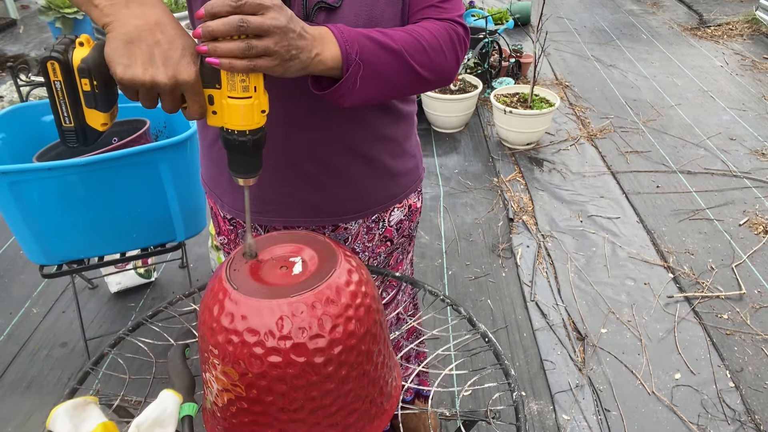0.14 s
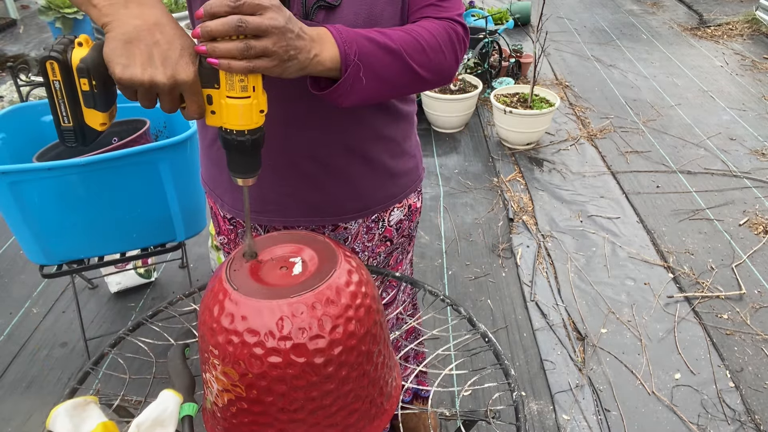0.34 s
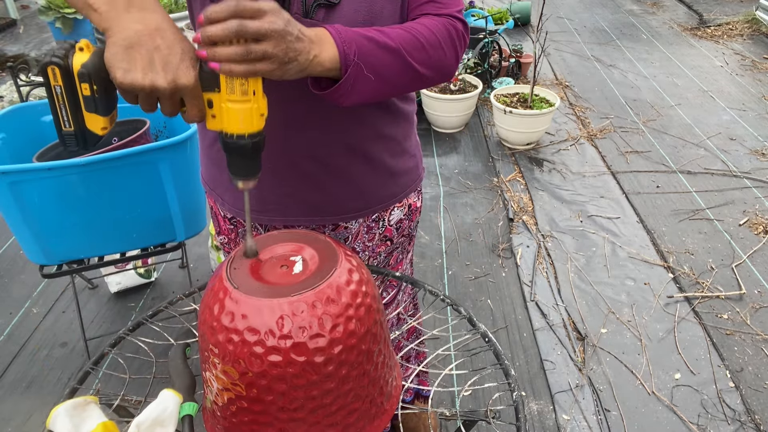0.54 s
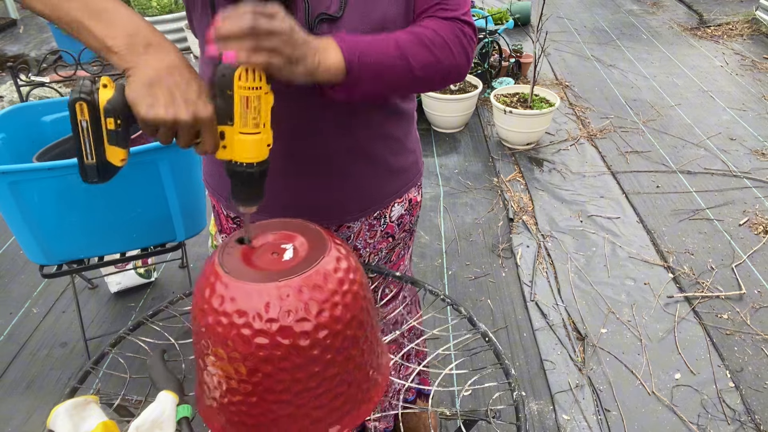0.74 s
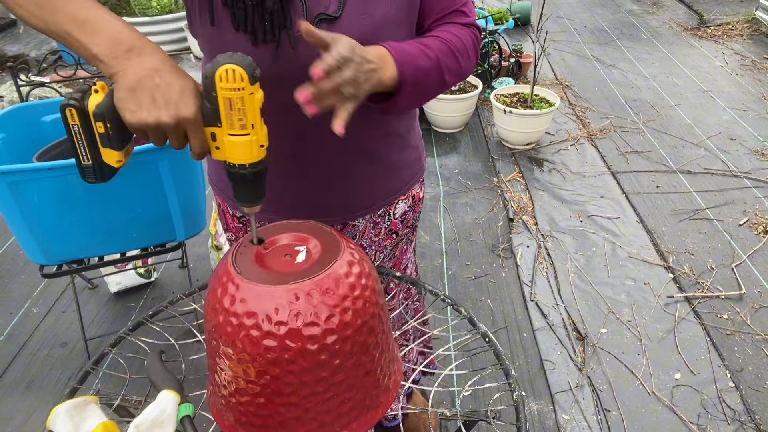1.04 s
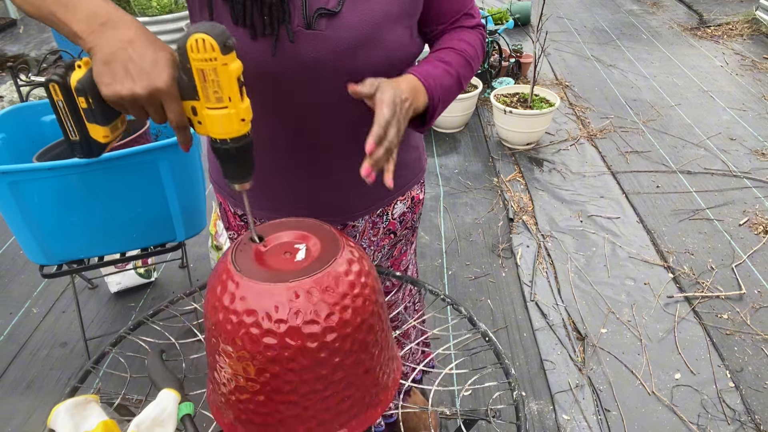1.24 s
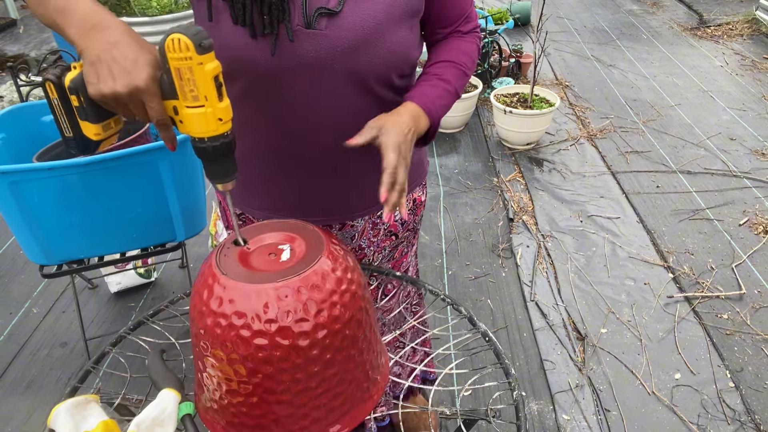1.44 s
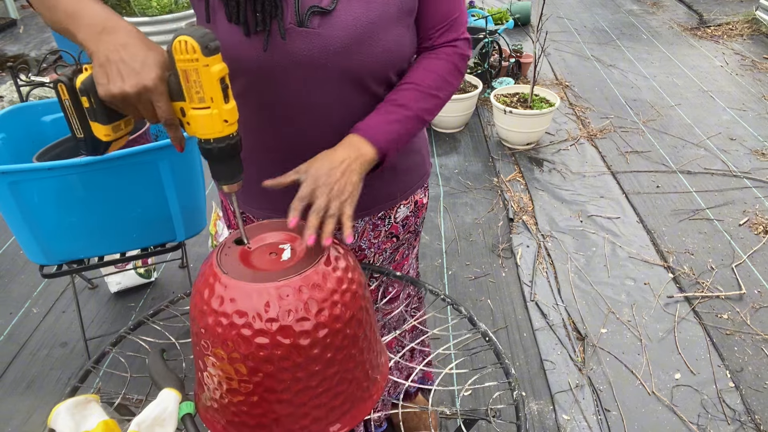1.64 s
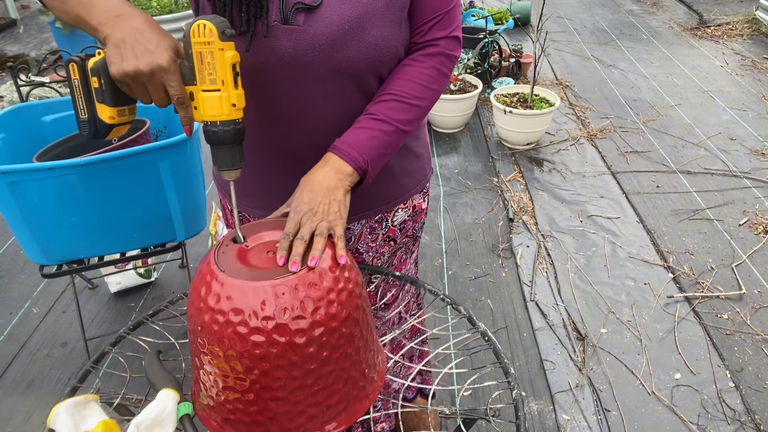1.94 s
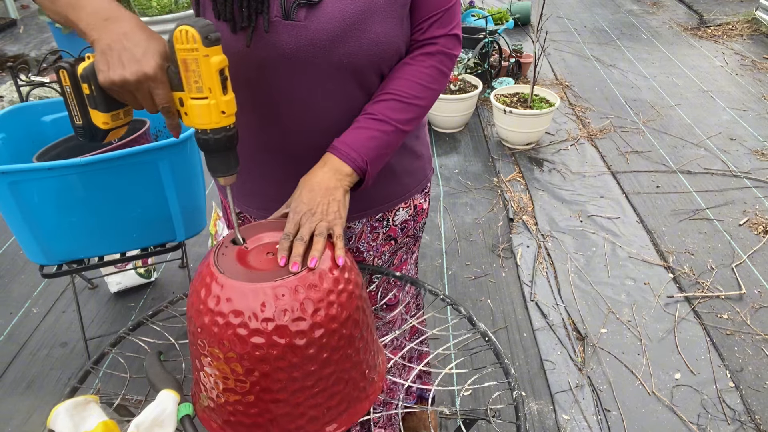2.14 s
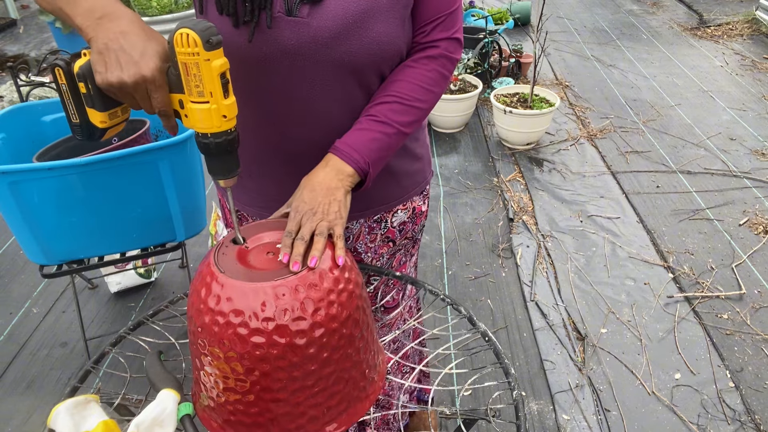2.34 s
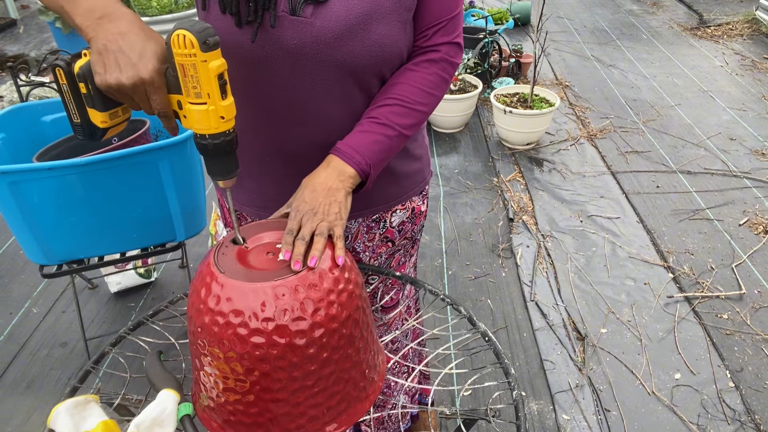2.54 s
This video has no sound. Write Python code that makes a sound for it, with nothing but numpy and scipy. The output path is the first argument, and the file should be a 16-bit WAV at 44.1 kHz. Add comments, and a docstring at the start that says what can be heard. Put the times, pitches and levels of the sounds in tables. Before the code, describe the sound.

Close up outdoors, a power drill's high whine and gritty boring give way to hollow bangs and a sudden stop with a click, then rattly scrapes, light pot taps, soft wind and faint birds.

```python
"""Drilling through a plastic pot outdoors

Close to the microphone pair, a cordless drill bores through an upturned pot, breaks through and brakes:
gliding sine whines over coloured noise. Random slips excite pot and table; knocks and booms are decaying modes.
The bit then scrapes and knocks in the hole and a hand lands on the hollow pot.
Wind rumbles as filtered noise; far birds cluck and whistle as gliding sines with a yard echo."""
import sys
import numpy as np
from scipy import signal
from scipy.fft import rfft, irfft, next_fast_len
from scipy.io import wavfile
from scipy.ndimage import uniform_filter1d

SR = 44100
rng = np.random.default_rng(int(sys.argv[2]) if len(sys.argv) > 2 else 0)


def dump_mix(stems):
    """Bounce the given channels to the path in sys.argv[1] as a 16-bit WAV at rate SR."""
    frames = np.atleast_2d(stems).T  # one column per channel
    limited = np.clip(frames, -1, 1)  # hard clip at full scale
    pcm = np.round(limited * 32767).astype(np.int16)
    wavfile.write(sys.argv[1], SR, pcm)


def nominal_scale(level):
    """Amplitude ratio for a level in decibels (scalar or array-like)."""
    x = np.asarray(level, float) / 20
    return 10 ** x


N = 119070

# Modes of the air in the pot. Each row: frequency in Hz, relative level in dB, t60 in s.
POT_AIR = [(302.4, 8, 0.099), (333, -12, 0.19), (272.5, -3.5, 0.18), (231, -4.5, 0.036), (154, -6, 0.059),
           (127, -14.5, 0.071)]
# Modes of the pot wall. Each row: frequency in Hz, relative level in dB, t60 in s.
POT_WALL = [(463, 10, 0.028), (618, 0, 0.039), (778, -1.5, 0.037), (905, 9.5, 0.026), (1052, 1.5, 0.031),
            (1213, 11.5, 0.015), (1418, 5, 0.029), (1694, -4, 0.04), (1884, -6, .04), (2240, -11.5, 0.047),
            (2926, -12.5, 0.019), (3560, -25, 0.046)]
# Modes of the table under the pot. Each row: frequency in Hz, relative level in dB, t60 in s.
TABLE = [(67, -17, 0.12), (103.4, -6.5, 0.22), (125, 1, 0.0092), (158, 4, 0.041), (215, 0, 0.078),
         (255, 2.5, .06)]


def evened(x):
    """Scales to unit rms."""
    return x / np.sqrt(np.mean(x ** 2) + 1e-20)


def curve(rows, col=1, off=None):
    """Draws a table column over time; off is the value outside the rows, else the end values hold."""
    rows = np.array(rows)
    return np.interp(np.arange(N) / SR, rows[:, 0], rows[:, col], off, off)


def phase(hz):
    """Sums a changing frequency into radians."""
    return 2 * np.pi * np.cumsum(hz) / SR


def read(points, hz):
    """Reads a spectrum table at hz, along a logarithmic frequency axis."""
    f, v = np.transpose(points)
    return np.interp(np.log(hz + 1), np.log(f + 1), v)


def coloured(points, x):
    """Filters x by a spectrum table in dB and scales it to unit rms."""
    gain = nominal_scale(read(points, np.fft.rfftfreq(N, 1 / SR)))
    return evened(irfft(rfft(x) * gain, N))


def slow_noise(size):
    """Random unit-rms drift: noise averaged twice over size samples."""
    once = uniform_filter1d(rng.standard_normal(N), size)
    return evened(uniform_filter1d(once, size))


def add(mix, s, sound):
    """Mixes a sound in at s seconds."""
    part = mix[round(s * SR):][:len(sound)]
    part += sound[:len(part)]


def ring(modes, tilt=0, rise_s=0.0012):
    """Sums the decaying modes that one blow excites, peak 1; tilt in dB per octave pivots at 1 kHz."""
    t = np.arange(SR // 3)[:, None] / SR
    hz, db, t60 = np.transpose(modes)
    level = nominal_scale(db + tilt * np.log2(hz / 1000) - 60 * t / t60)
    r = (level * np.sin(2 * np.pi * hz * t)).sum(1)
    r = r * (1 - np.exp(-t[:, 0] / rise_s))
    return r / abs(r).max()


def damped(x, held, power):
    """Chokes a ring: half its amplitude is left at held seconds, ever less after."""
    return x / (1 + (np.arange(len(x)) / SR / held) ** power)


def slips(per_s, spread_db):
    """Sparse random clicks of uneven size."""
    u, e, g = rng.random(N), rng.exponential(1, N), rng.standard_normal(N)
    return (u < per_s / SR) * nominal_scale(spread_db * np.minimum(e, 4)) * g


def motor():
    """Gear whines at the tooth mesh and its multiples ride on the rush of brushes and fan."""
    # Gear whine. Each row: time in s, mesh frequency in Hz, rms level in dB.
    whine = [(0, 4137, -37), (.2, 4132, -36), (.43, 4090, -37), (.5, 4055, -36), (.536, 3990, -35),
             (.6, 4090, -40), (.68, 4200, -36), (.71, 4215, -30), (.79, 4257, -33), (.83, 4160, -31),
             (.88, 3910, -35), (.95, 3520, -37), (.965, 3450, -50)]
    # Upper whines. Each row: multiple of the mesh, then a list of time in s, rms level in dB.
    upper = [(2.5, [(0, -39), (.3, -36), (.5, -34), (.7, -31), (.73, -44), (.83, -39), (.86, -70)]),
             (2.93, [(.8, -70), (.83, -46), (.89, -48), (.92, -37), (.96, -37), (.975, -70)])]
    # Motor and cooling fan rush. Each row: time in s, rms level in dB.
    rush_level = [(0, -24), (.3, -24.5), (.6, -24.5), (.72, -27), (.85, -26), (.98, -29), (1.008, -28),
                  (1.016, -46.5), (1.05, -58), (1.075, -74)]
    # Colour of the rush. Each row: frequency in Hz, relative level in dB per Hz.
    rush_colour = [(300, -24), (700, -4.5), (1500, -5), (2500, -3.5), (3300, -8.5), (4300, -3.5),
                   (5500, -7.5), (7500, -5), (9000, 2.5), (10500, -5), (12000, -14.5), (14500, -0.5),
                   (15800, -22)]
    waver = 0.0014 * evened(uniform_filter1d(rng.standard_normal(N), 300))
    turning = phase(curve(whine) * (1 + waver))
    out = np.sqrt(2) * nominal_scale(curve(whine, col=2, off=-120)) * np.sin(turning)
    for multiple, level in upper:
        out += np.sqrt(2) * nominal_scale(curve(level, off=-120)) * np.sin(multiple * turning)
    rush = rng.standard_normal(N) + .5 * evened(slips(2500, 3))
    running = np.arange(N) < rush_level[-1][0] * SR
    return out + nominal_scale(curve(rush_level)) * running * coloured(rush_colour, rush)


def grinding(drive):
    """Slips of the bit on the wall ring its modes and scuff broadly."""
    # Bit grinding on the wall. Each row: time in s, rms level in dB.
    grind = [(0, -30), (.25, -29), (.45, -30), (.51, -32), (.55, -27.5), (.62, -32), (.635, -42),
             (.7, -30.5), (.74, -31.5), (.77, -28.5), (.82, -28.5), (.89, -35.5), (.99, -37), (1.03, -41),
             (1.07, -55.5), (1.15, -64), (1.19, -44.5), (1.21, -52.5), (1.26, -72), (1.268, -46.5),
             (1.34, -51.5), (1.415, -53.5), (1.423, -43), (1.47, -30), (1.54, -36.5), (1.6, -47.5),
             (1.7, -58), (1.75, -52), (1.81, -55), (1.84, -52), (1.91, -65.5), (2.05, -74), (2.15, -79.5)]
    # Broad part of the grind. Each row: frequency in Hz, relative level in dB per Hz.
    scuff = [(300, -22), (500, 1), (900, 5.5), (1300, 14), (2000, -4), (3200, -9), (5000, -38)]
    wall = evened(signal.oaconvolve(drive, ring(POT_WALL))[:N])
    wall = wall + nominal_scale(3.5) * coloured(scuff, drive)
    return nominal_scale(curve(grind, off=-120)) * evened(wall)


def rocking(drive):
    """The same slips rock the pot, shaking the air inside and the table."""
    # Bit rocking the pot. Each row: time in s, boom rms level in dB, table thud rms level in dB.
    rock = [(0.0, -32.5, -30.5), (.2, -35, -32), (0.46, -35, -33.5), (0.75, -27, -43.5), (1.13, -49, -55),
            (1.5, -56.5, -38.5), (1.65, -50.5, -82), (1.73, -46, -48.5), (2.2, -74.5, -73)]
    boom = evened(signal.oaconvolve(drive, ring(POT_AIR))[:N])
    thud = evened(signal.oaconvolve(drive, ring(TABLE))[:N])
    return nominal_scale(curve(rock, off=-120)) * boom + nominal_scale(curve(rock, col=2, off=-120)) * thud


def wind():
    """Gusts rumble at the two ports as partly shared low noise."""
    # Gusts. Each row: time in s, level in dB.
    gusts = [(1.9, -59), (1.98, -67), (2.02, -50), (2.12, -59), (2.18, -47), (2.3, -54.5), (2.36, -44.5),
             (2.5, -47.5), (2.6, -47.5), (2.7, -57)]
    # Colour of the rumble. Each row: frequency in Hz, relative level in dB per Hz.
    rumble = [(20, -22.5), (35, -4), (50, 7), (90, -3), (130, -16), (200, -33), (450, -40.5), (700, -69.5)]
    shared, apart = rng.standard_normal((2, N))
    pair = np.array([coloured(rumble, shared + 0.74 * apart), coloured(rumble, shared - 0.26 * apart)])
    return nominal_scale(curve(gusts) + 2.5 * slow_noise(2000)) * pair


def hush():
    """Faint steady outdoor noise, partly shared by the ports."""
    # Colour of the hush. Each row: frequency in Hz, relative level in dB per Hz.
    air = [(200, 0), (600, -12), (1500, -15.5), (3000, -23), (15500, -33)]
    shared, apart = rng.standard_normal((2, N))
    return nominal_scale(-71.5) * np.array([coloured(air, shared + apart), coloured(air, shared - apart)])


def booms():
    """Blows swell the air in the hollow pot until the bit damps it."""
    # Booms. Each row: start in s, level in dB before damping, s until half damped.
    hits = [(0.032, -24, 0.079), (0.118, -16.5, 0.015), (.153, -15, 0.027), (.274, -25.5, 0.016),
            (.426, -25, 0.055), (0.536, -18, 0.025), (0.563, -20, 0.054), (0.623, -19, 0.0056),
            (0.712, -9.5, 0.013), (0.753, -20.5, .025), (0.766, -10.5, 0.0083), (0.785, -10.5, 0.016),
            (.822, -13, 0.023), (0.864, -19, 0.029), (.895, -19.5, 0.026), (1.267, -28.5, 0.025),
            (1.304, -28, 0.054), (1.339, -30, 0.039), (1.361, -30.5, 0.029), (1.443, -11, .025),
            (1.461, -10, 0.022), (1.485, -17, 0.024), (1.512, -13, 0.028), (1.559, -26, 0.025),
            (1.585, -27.5, 0.026), (1.623, -34, 0.043), (1.733, -35, 0.051), (1.818, -34.5, 0.015),
            (1.836, -22, 0.019), (2.019, -36, 0.03)]
    out, boom = np.zeros(N), ring(POT_AIR, rise_s=0.031)
    for s, db, held in hits:
        add(out, s, nominal_scale(db) * damped(boom, held, 4))
    return out


def knocks():
    """Knocks ring the wall, each with a short crunch of extra impulses and its own mode shifts."""
    # Knocks. Each row: start in s, peak level in dB, brightness in dB per octave, s until half damped.
    hits = [(0.5325, -16, 4, 0.0027), (0.5367, -5.5, -4.5, 0.019), (0.581, -17, -3, .006),
            (0.6113, -8.5, -3.5, 0.0066), (0.6182, -14, 0.5, 0.011), (0.711, -15, 8.5, 0.011),
            (.766, -16, 7, 0.0093), (0.791, -23, 3.5, .012), (0.9967, -6.5, 12.5, 0.003),
            (1.003, -18, 3, 0.0058), (1.009, -22, 10, .003), (1.023, -19.5, 6.5, 0.0051),
            (1.224, -27, 4, 0.0033), (1.267, -29, 7, 0.015), (1.302, -35.5, 3, 0.013),
            (1.36, -34.5, 6.5, 0.0072), (1.372, -35.5, -3, .008), (1.421, -23.5, 9, 0.017),
            (1.438, -14.5, 8, 0.0034), (1.443, -25.5, 9, 0.0097), (1.474, -17.5, 5.5, 0.0059),
            (1.73, -36.5, -4, .015), (1.778, -32, -0.5, 0.0096), (1.816, -38, -2, 0.016),
            (1.832, -33.5, -5, 0.014)]
    out, shape = np.zeros(N), (len(hits), 400)
    crunch = (1 + rng.standard_normal(shape)) * (rng.random(shape) < .1)
    crunch = crunch * np.exp(-np.arange(400) / SR / 0.0024)
    # each knock lands on another spot and shifts the wall frequencies by 4 % (one deviation)
    spots = 1 + .04 * rng.standard_normal((len(hits), len(POT_WALL), 1)) * [1, 0, 0]
    for (s, db, tilt, held), grains, spot in zip(hits, crunch, spots):
        wall = ring(POT_WALL * spot, tilt)
        knock = wall + .2 * np.convolve(wall, grains)[:SR // 3]
        knock = damped(knock, held, 3)
        add(out, s, nominal_scale(db) * knock / abs(knock).max())
    return out


def ticks():
    """Sharp ticks: decaying bursts of noise, shared between a dull and a bright colour."""
    # Ticks. Each row: start in s, level in dB, t60 in s, share of bright treble from 0 to 1.
    hits = [(0.5352, -10, 0.014, 0.27), (0.982, -23, 0.013, .3), (0.9976, -9.5, 0.012, 0.2),
            (1.003, -23.5, 0.017, 0.55), (1.025, -26.5, 0.023, 0.5), (1.029, -33.5, .01, 0.1),
            (1.0383, -27.5, .02, 0.34), (1.044, -38, 0.012, 0.4), (1.079, -54, 0.014, .9),
            (1.109, -51.5, 0.029, 0.8), (1.224, -39, 0.037, 0.57), (1.267, -50, 0.028, 0.5),
            (1.367, -52, 0.018, 1), (1.42, -40, 0.028, 0.4), (1.441, -37.5, 0.018, 0.6),
            (1.45, -20.5, 0.037, .8), (1.713, -49.5, .025, 0.9), (1.721, -36.5, 0.032, 0.7),
            (1.727, -53, 0.025, .8), (1.749, -44, 0.023, 0.17)]
    # Dull colour. Each row: frequency in Hz, relative level in dB per Hz.
    dull_colour = [(1500, -22.5), (3000, -0.5), (4500, -7.5), (8000, -22)]
    # Bright colour. Each row: frequency in Hz, relative level in dB per Hz.
    bright_colour = [(2500, -19.5), (5000, -14), (8500, 5), (15500, -10)]
    dull, bright = np.zeros((2, N))
    t = np.arange(SR // 8) / SR
    for s, db, t60, share in hits:
        decay = nominal_scale(db - 60 * t / t60)
        add(dull, s, (1 - share) * decay)
        add(bright, s, share * decay)
    out = dull * coloured(dull_colour, rng.standard_normal(N))
    return out + bright * coloured(bright_colour, rng.standard_normal(N))


def table_hum():
    """The wire table hums on after the breakthrough as one gliding sine."""
    # Hum. Each row: time in s, frequency in Hz, rms level in dB.
    hum = [(0.76, 254.7, -37.5), (0.976, 264.1, -36), (1.23, 256, -55)]
    level = uniform_filter1d(nominal_scale(curve(hum, col=2, off=-120)), 400)
    return np.sqrt(2) * level * np.sin(phase(curve(hum)))


def grit():
    """Chips and grit rustle: noise roughened by sparse clicks."""
    # Rustle. Each row: time in s, rms level in dB.
    rustle = [(1.0, -41), (1.04, -45.5), (1.07, -66.5), (1.1, -76), (1.112, -51), (1.15, -64),
              (1.19, -53.5), (1.205, -60.5), (1.22, -55), (1.25, -72), (1.27, -56.5), (1.34, -65),
              (1.415, -69.5), (1.425, -59.5), (1.45, -36), (1.48, -48), (1.576, -71), (1.64, -64.5),
              (1.705, -68.5), (1.715, -48.5), (1.74, -53), (1.774, -75), (1.824, -65.5), (1.864, -91),
              (1.95, -87)]
    # Colour of the rustle. Each row: frequency in Hz, relative level in dB per Hz.
    colour = [(1200, -13), (2500, -1.5), (5000, -5.5), (8000, -11), (12000, -16), (15500, -14.5)]
    grains = rng.standard_normal(N) + 0.31 * evened(slips(760, 2.7))
    return nominal_scale(curve(rustle, off=-120)) * coloured(colour, grains)


def thumps():
    """The pot rim thumps the table and rings its modes."""
    # Thumps. Each row: start in s, peak level in dB.
    hits = [(1.267, -26), (1.304, -29.5), (1.341, -36), (1.364, -44), (2.007, -46)]
    out = np.zeros(N)
    for s, db in hits:
        add(out, s, nominal_scale(db) * ring(TABLE, 5, rise_s=0.0035))
    return out


def bit_ring():
    """A blow makes the steel bit ring in its high modes."""
    # Blows on the bit. Each row: start in s, peak level in dB.
    hits = [(1.447, -18)]
    # Modes of the bit. Each row: frequency in Hz, relative level in dB, t60 in s.
    steel = [(7460, 0, .07), (7770, -2, .07), (8500, -1, .09), (10200, -3, .06), (12500, -9, .04),
             (13600, -9, .05)]
    out = np.zeros(N)
    for s, db in hits:
        add(out, s, nominal_scale(db) * ring(steel))
    return out


def whistles():
    """Far birds whistle thin gliding sines whose level flutters."""
    # One list per whistle. Each row: time in s, frequency in Hz, level in dB before the flutter.
    calls = [
        [(1.565, 4700, -70), (1.63, 4660, -69)],
        [(2.455, 5700, -93), (2.48, 5600, -88), (2.49, 5230, -77), (2.502, 5060, -74), (2.53, 4800, -76),
         (2.55, 4640, -77), (2.595, 4560, -70), (2.62, 4490, -69), (2.65, 4470, -76), (2.7, 4520, -76)],
    ]
    out, flutter = np.zeros(N), nominal_scale(3.5 * slow_noise(300))
    for rows in calls:
        level = uniform_filter1d(nominal_scale(curve(rows, col=2, off=-140)), 300)
        out += flutter * level * np.sin(phase(curve(rows)))
    return out


def clucks():
    """Far birds cluck: falling two-band tones, raspy in level, with one slap off a wall."""
    # Clucks. Each row: start in s, level in dB before the rasp.
    calls = [(1.985, -66), (2.092, -65), (2.198, -62), (2.302, -63), (2.404, -65)]
    length_s, start_hz, end_hz = .036, 1400, 880
    out, t = np.zeros(N), np.arange(0, length_s, 1 / SR)
    a = phase(start_hz * (end_hz / start_hz) ** (t / length_s))
    cluck = np.hanning(len(t)) * (np.sin(a) + nominal_scale(-9) * np.sin(1.65 * a))
    for s, db in calls:
        add(out, s, nominal_scale(db) * cluck)
    out = out * (1 + .7 * slow_noise(65))
    return out + nominal_scale(-17) * np.roll(out, round(.045 * SR))  # the slap comes 45 ms later


def yard_echo(x):
    """Adds a yard echo to each ear: a separate tail of decaying noise."""
    t60_s, level_db, rise_s = .25, -2, 0.0083
    t = np.arange(SR // 2) / SR
    tail = rng.standard_normal((2, len(t))) * nominal_scale(-60 * t / t60_s) * np.minimum(t / rise_s, 1)
    tail = tail / np.linalg.norm(tail[0])
    return x + nominal_scale(level_db) * signal.fftconvolve(x[None], tail, axes=1)[:, :N]


def ports(x):
    """The two microphone ports hear near sounds with a phase lead, a level tilt and scattered reflections."""
    # Phase between the ports. Each row: frequency in Hz, radians the right port leads.
    lead = [(100, 0), (6300, .1), (7200, .7), (7900, 1.7), (8700, 2.75), (9300, 3.14), (9700, 3.4),
            (10700, 4.8), (11200, 6.0), (11900, 6.28), (12600, 6.6), (13400, 8.0), (14200, 9.1),
            (14800, 9.42), (15400, 10.0), (16000, 9.7)]
    # Level between the ports. Each row: frequency in Hz, left minus right in dB.
    tilt = [(100, -1.5), (400, -1.5), (1000, 0), (2400, 1.5), (5000, 2), (7000, 0), (16000, 0)]
    # Side reflections. Each row: frequency in Hz, level in dB.
    scatter = [(100, -16), (300, -19), (650, -10), (1400, -19), (2800, -9), (3800, -12), (5200, -8),
               (7400, -6), (8600, -21), (16000, -21)]
    size, t = next_fast_len(N + SR // 4), np.arange(SR // 8) / SR
    hz = np.fft.rfftfreq(size, 1 / SR)
    taps = rng.standard_normal(len(t)) * nominal_scale(-60 * t / 0.14)  # t60 of 0.14 s
    half = nominal_scale(read(tilt, hz) / 2) * np.exp(-.5j * read(lead, hz))
    side = nominal_scale(read(scatter, hz)) * rfft(taps / np.linalg.norm(taps), size)
    pair = np.array([half * (1 + side), (1 - side) / half])
    return irfft(rfft(x, size) * pair, size)[:, :N]


def scene():
    """Drill, pot and table close to the microphones, low cut at 57 Hz; far birds and wind around them."""
    drive = slips(2500, 0.5)
    near = motor() + grinding(drive) + rocking(drive) + booms() + knocks() + ticks()
    near = near + table_hum() + grit() + thumps() + bit_ring()
    near = signal.sosfilt(signal.butter(4, 57, "high", fs=SR, output="sos"), near)
    return ports(near) + wind() + hush() + yard_echo(whistles() + clucks())


def band_limit(x):
    """A steep low-pass at the top of the band."""
    return signal.sosfilt(signal.butter(12, 15870, fs=SR, output="sos"), x)


def record(dry):
    """Passes on the finished stereo mix."""
    return band_limit(dry)


dry = scene()
out = record(dry)
dump_mix(out)
```